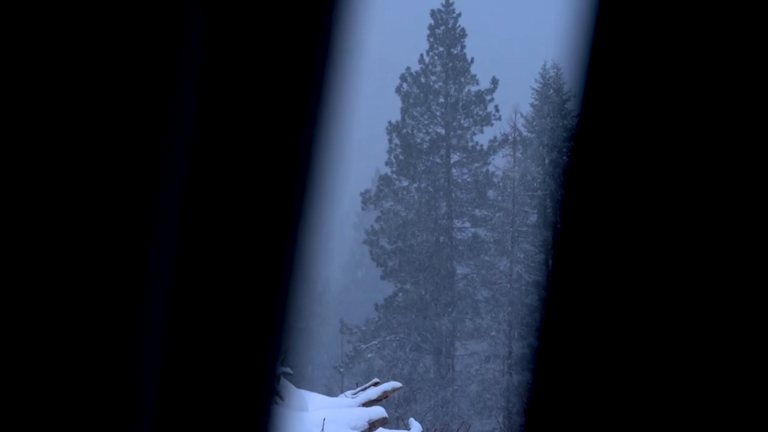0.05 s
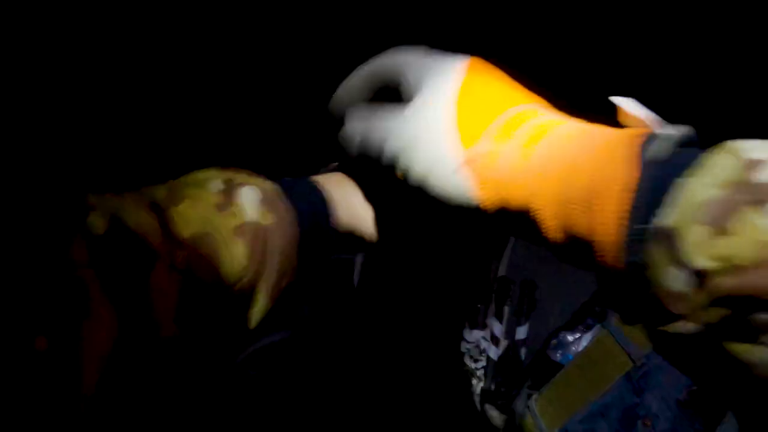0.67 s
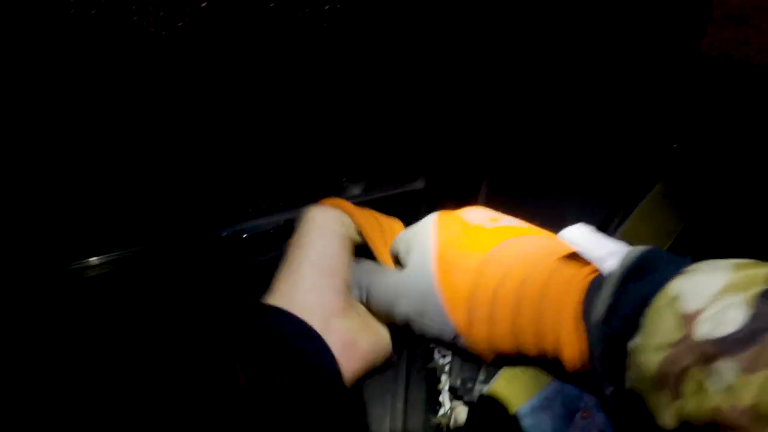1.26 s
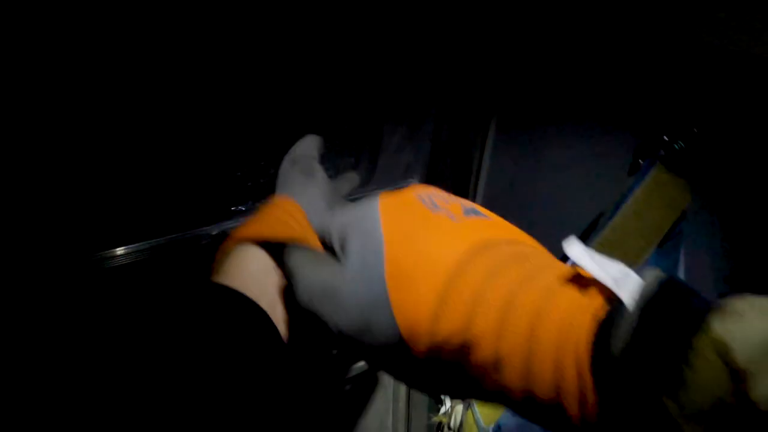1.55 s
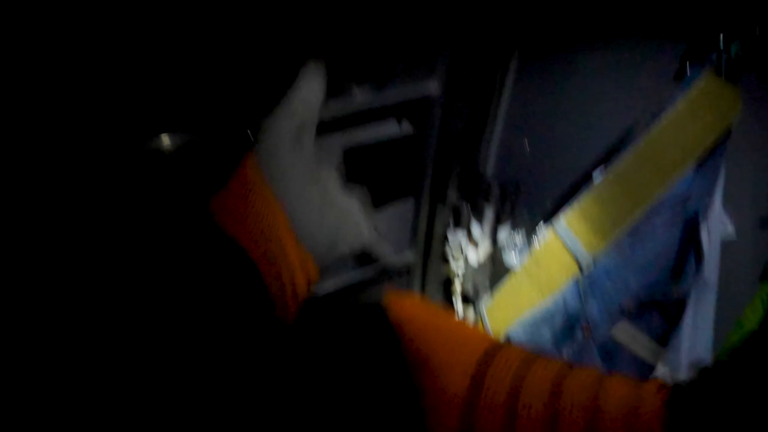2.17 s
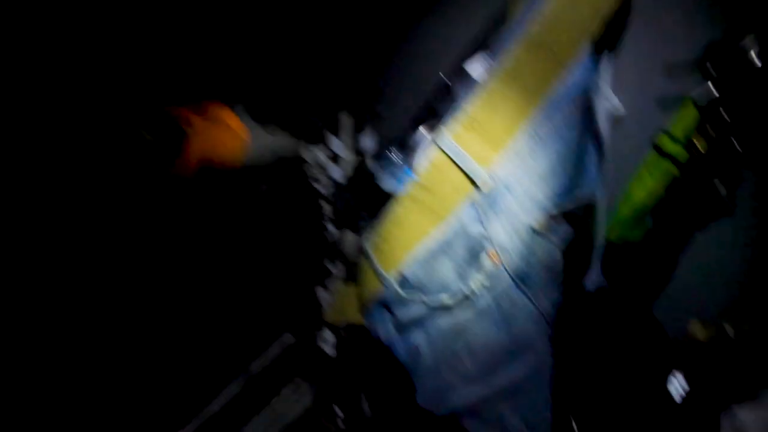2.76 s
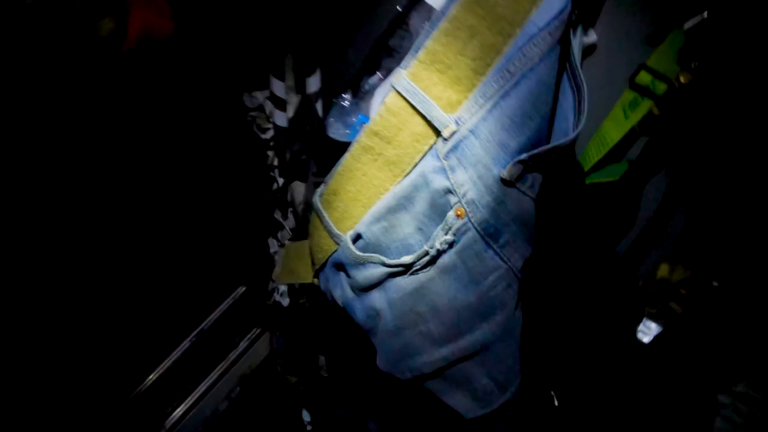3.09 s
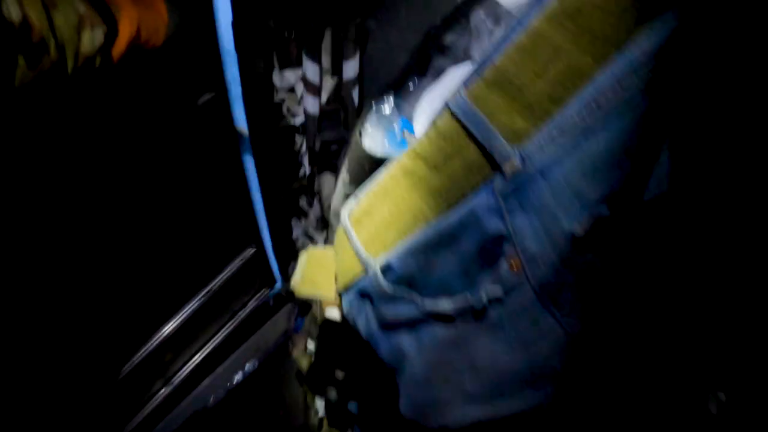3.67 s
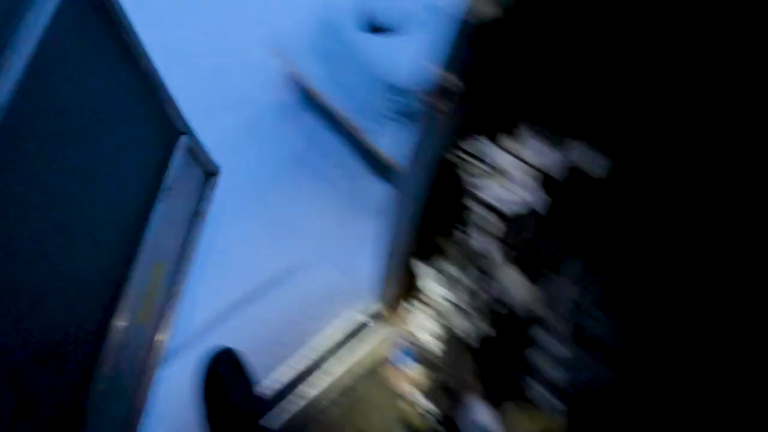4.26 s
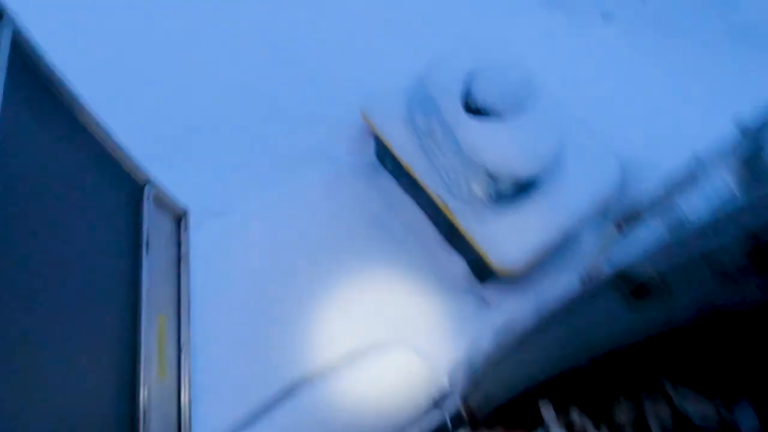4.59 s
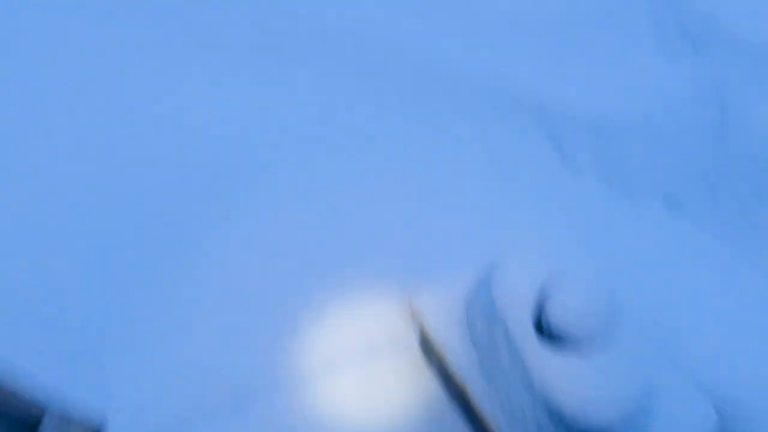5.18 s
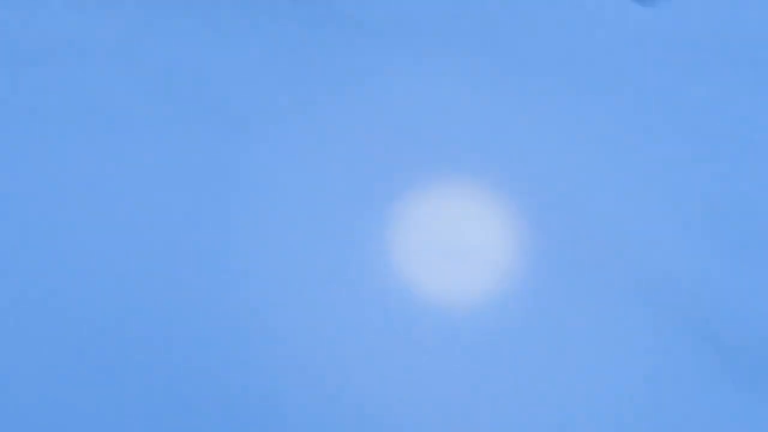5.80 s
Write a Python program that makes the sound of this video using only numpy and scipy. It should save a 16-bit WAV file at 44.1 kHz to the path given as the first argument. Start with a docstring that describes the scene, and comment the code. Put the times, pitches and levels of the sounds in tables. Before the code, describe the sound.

A moment of soft wind in trees dies away inside a vehicle cab. Someone pulls on work gloves: cloth rubs and crackles, an elastic cuff snaps on the wrist, and gear ticks and knocks. Then the door latch springs open with a loud metallic clack and a brief rattle, and a dull, wide outdoor roar rises. The body-worn microphone is close and hisses faintly.

```python
"""A vehicle's door latch springs open with a loud clack, heard close from inside the cab in snowy woods.
Before it, someone pulls on work gloves: cloth rubs and crackles, an elastic cuff snaps on the wrist,
gear ticks and knocks. After it, the door rattles free and swings open on a dull outdoor roar.
The body-worn microphone sways and hisses faintly. Everything sits in the centre but the outdoor air:
a moment of wind in the trees at the start, and the roar at the end."""
import sys
import numpy as np
from scipy import signal
from scipy.fft import rfft, irfft, next_fast_len
from scipy.io import wavfile
from scipy.ndimage import uniform_filter1d

SR = 44100
rng = np.random.default_rng(int(sys.argv[2]) if len(sys.argv) > 2 else 0)


def bounce(signal):
    """Save signal as a 16-bit WAV file at the path given by the first command-line argument."""
    frames = np.transpose(np.atleast_2d(signal))
    limited = np.clip(frames, -1, 1)
    pcm = np.round(limited * 32767).astype(np.int16)
    wavfile.write(sys.argv[1], SR, pcm)


N = 261954
TIME = np.arange(N) / SR


def door():
    """The handle takes up slack, the latch lets go and bounces, its parts rattle and the panel booms."""
    # contacts of handle and door: start_s, level_db, top_hz, boom_db
    rattles = [(3.5440, -28, 10000, -38), (3.553, -26.5, 9000, -32), (3.5604, -18, 9000, -26),
               (3.5700, -28, 3000, -24), (3.602, -20, 8000, -19), (3.6380, -23, 2800, -35),
               (3.6422, -26, 3500, -41), (3.668, -27.5, 4500, -44), (3.7012, -22.5, 9400, -35),
               (3.7187, -28, 11000, -33.5), (3.729, -23.5, 9100, -28), (3.7430, -32, 3500, -26.5),
               (3.7615, -26, 4500, -26), (3.7770, -33.5, 4000, -30)]
    # resonances of the latch: pitch_hz, width_hz, gain_db
    latch_modes = [(1215, 35, 3), (1366, 55, 6), (1590, 180, 5), (2060, 46, 1), (2385, 52, 6),
                   (2570, 85, 1), (2750, 50, 3), (2950, 99, 1), (3250, 47, -2), (3400, 55, -5.5),
                   (4000, 200, -3), (4570, 332, -3), (6220, 180, -5), (6800, 140, -4), (8250, 200, 1),
                   (9000, 536, -1.5)]
    release_s, bounce_s, latch_low_hz = 3.5795, .003, 1260
    boom = dict(low_hz=390, top_hz=760, t60_s=.1)
    blows, panel = np.zeros((2, N))
    for k in range(3):   # the release, then two bounces, each softer and duller
        blow = contact(0.78 - 8.5 * k, latch_low_hz, top_hz=10500 * .62 ** k, t60_s=.027, crack=.0805)
        add(blows, release_s + k * bounce_s, blow)
    thump = contact(level_db=-16.5, low_hz=72, top_hz=150, t60_s=.3, crack=.98)
    add(panel, release_s + bounce_s, thump + contact(level_db=-22, **boom, crack=.63))
    for start_s, level_db, top_hz, boom_db in rattles:
        add(blows, start_s, contact(level_db, latch_low_hz, top_hz, t60_s=.045, crack=.25))
        add(panel, start_s, contact(boom_db, **boom, crack=.4))
    ringing = sum(ring(blows, latch_modes))
    metal = band(from_db(-5) * blows + from_db(-4.5) * ringing, low_hz=200, top_hz=13700)
    return metal + panel + from_db(-14.5) * cab(metal + panel, top_hz=9000)


def cuff_snap(start_s=1.5403, level_db=-21.5):
    """One clean slap of elastic on skin rings briefly and wakes the cab."""
    # resonances of the cuff on the wrist: pitch_hz, width_hz, gain_db
    cuff_modes = [(244, 160, -10), (587, 175, 2.5), (755, 320, -0.5), (1120, 240, -1), (2450, 1200, -13.5),
                  (3750, 730, -10.5), (9100, 12000, -27.5)]
    impulse = np.zeros(N)
    add(impulse, start_s, np.ones(1))
    slap = sum((-1) ** k * mode for k, mode in enumerate(ring(impulse, cuff_modes)))
    slap = at_level(slap, level_db)
    return slap + from_db(-4) * cab(band(slap, 840, 12000, order=1), top_hz=6000)


def gear_ticks():
    """Small hard parts touch right beside the microphone; smaller parts sound higher."""
    # ticks of clothing and gear: start_s, level_db, low_hz
    ticks = [(0.0297, -25.5, 2600), (0.3900, -34.5, 7000), (0.459, -31, 600), (0.5538, -42, 4000),
             (0.6549, -40.5, 3000), (0.7496, -29.5, 450), (0.8420, -42.5, 7000), (1.0893, -40.5, 2500),
             (2.511, -28.5, 1500), (2.684, -35.5, 6200), (2.9312, -41.5, 600), (3.0770, -35.5, 3500),
             (3.4502, -32.5, 796), (3.4730, -38.5, 1500), (4.2654, -36.5, 4000), (4.3482, -40, 1200),
             (4.4415, -35.5, 1400), (4.5185, -34.5, 1500), (4.5463, -32.5, 1000), (4.653, -37, 600),
             (5.0050, -43.5, 4950), (5.0557, -37.5, 2500), (5.2550, -40.5, 1200)]
    out = np.zeros(N)
    for start_s, level_db, low_hz in ticks:
        top_hz = 8500 * (low_hz / 1000) ** .25
        add(out, start_s, contact(level_db, low_hz, top_hz, t60_s=.011, crack=.7, order=1))
    return out + from_db(-9.5) * cab(out, top_hz=12000)


def gear_knocks():
    """Softer, heavier contacts on hollow gear; the deeper ones stir the cab more."""
    # dull blows that excite the gear: start_s, level_db, centre_hz, t60_s
    knocks = [(0.4590, -31, 760, 0.0057), (1.2120, -42, 238, .018), (1.7230, -49, 736, 0.033),
              (1.845, -46, 150, 0.044), (2.5112, -37.5, 920, .01), (2.6110, -36.5, 500, 0.022),
              (2.615, -31.5, 1130, 0.015), (2.945, -37.5, 98, .06), (2.9891, -30, 1340, 0.039),
              (2.9940, -38, 290, 0.1), (3.2686, -40.5, 1310, 0.045), (3.2730, -40.5, 368, .07),
              (4.6667, -37.5, 1100, .009), (5.782, -32, 450, 0.028), (5.877, -45, 700, 0.054)]
    # hollow resonances of the gear: pitch_hz, width_hz, gain_db
    hollow_modes = [(267, 104, 1.5), (492, 81, 2.5), (1127, 220, 1.5), (1414, 140, 4), (1590, 75, -3.5),
                    (2335, 150, 4)]
    out, echo_send = np.zeros((2, N))
    for start_s, level_db, centre_hz, t60_s in knocks:
        blow = contact(level_db, centre_hz / 1.8, centre_hz * 1.8, t60_s, crack=.48)
        blow = band(blow, low_hz=40, top_hz=3600)   # soft surfaces take off the top
        knock = from_db(-1) * blow + sum(ring(blow, hollow_modes))
        send_db = -16 - 5 * np.log2(centre_hz / 1000)
        add(out, start_s, knock)
        add(echo_send, start_s, knock * from_db(send_db))
    return out + cab(echo_send, top_hz=4970)


def cloth_rubs():
    """Fibres catch and slip thousands of times a second under each swelling stroke."""
    # strokes of cloth and glove: middle_s, half_length_s, level_db, top_hz
    strokes = [(0.686, .023, -47, 10000), (1.117, .017, -47, 14000), (1.312, .028, -49.5, 2840),
               (1.369, .05, -58, 1400), (1.566, 0.029, -47.5, 3000), (1.801, 0.064, -50.5, 6500),
               (1.93, .11, -58.5, 15000), (2.112, 0.036, -49.5, 2600), (2.151, 0.017, -50.5, 2800),
               (2.359, 0.084, -58, 8000), (2.499, .025, -52, 2600), (2.516, 0.042, -49.5, 13000),
               (2.928, 0.045, -56.5, 1210), (2.984, .035, -52.5, 9000), (3.245, .021, -53.5, 8000),
               (3.507, .046, -58.5, 5000), (4.364, 0.024, -55, 4600), (4.583, .053, -50.5, 9000),
               (5.087, 0.028, -53, 11000), (5.293, .06, -60, 7000), (5.513, .096, -57, 9000)]
    out = np.zeros(N)
    t = TIME[:SR // 2] - 1 / 4
    for middle_s, half_length_s, level_db, top_hz in strokes:
        low_hz = min(top_hz / 2.84, 1090)
        friction = rng.standard_normal(len(t))
        slips = friction * from_db(7.2 * np.clip(rng.standard_normal(len(t)), -2, 2))
        rasp = band(band(slips, low_hz, top_hz), low_hz, top_hz)   # soft cloth gives steep edges
        rasp /= np.sqrt(np.mean(rasp ** 2) + 1e-20)
        swell = np.exp(-2 * (t / half_length_s) ** 2)
        add(out, middle_s + t[0], from_db(level_db) * swell * rasp)
    return out


def fabric_crackle():
    """Creases in stiff fabric let go at random, most of them barely above the hiss."""
    creases_per_s = with_door(shut=28, wide_open=10)
    lets_go = rng.random(N) < creases_per_s / SR
    sizes = from_db(-41 + 3.1 * np.minimum(rng.exponential(1, N), 2.5)) * rng.choice([-1, 1], N)
    clicks = band(lets_go * sizes + 1e-18, low_hz=4500, top_hz=14000)
    return clicks + from_db(-7.5) * cab(clicks, top_hz=13070)


def outdoor_air():
    """Wind in the trees drops and dies away soon after the start; later the opening door lets in a wide roar."""
    # spectrum of the wind: frequency_hz, density_db
    wind_spectrum = [(20, -6), (50, 0), (130, 2.5), (190, -1), (320, 1), (480, -3.5), (700, -9),
                     (1200, -14.5), (2000, -24.5), (4000, -30), (9000, -32), (16000, -40)]
    # spectrum of the outdoor roar: frequency_hz, density_db
    roar_spectrum = [(25, 8), (45, 3.5), (95, 0.5), (170, -5), (290, 1), (400, -0.5), (540, -3),
                     (660, -10.5), (1000, -17), (1600, -26), (3000, -33), (8000, -33), (16000, -43)]
    wind_ends_s, drop_s, drop_db, fade_db_per_s = .68, .054, 6.5, 42
    since_s = np.maximum(TIME - wind_ends_s, 0)
    wind_db = -43.5 - drop_db * np.minimum(since_s / drop_s, 1) - fade_db_per_s * since_s
    wind = from_db(wind_db) * steady_noise(wind_spectrum)
    gap = with_door(shut=0, wide_open=1)
    roar = np.sqrt(gap) * from_db(-43) * steady_noise(roar_spectrum)   # power grows with the gap
    mid, side = wind + roar
    left_right = np.array([[1], [-1]])
    return (mid + side * left_right) * from_db(-1.5 / 2 * left_right)   # leans 1.5 dB to the right


def cab_rumble():
    """The cab's low, steady rumble rises a little as the door opens."""
    # spectrum of the rumble: frequency_hz, density_db
    spectrum = [(25, -25.5), (60, 0.5), (110, 0.5), (170, 2), (260, -2.5), (380, -14.5), (540, -5.5),
                (800, -20)]
    return from_db(with_door(shut=-60, wide_open=-56.5)) * steady_noise(spectrum)[0]


def microphone_hiss():
    """A faint hiss flutters slightly and grows duller as the door opens."""
    # contour of the hiss: time_s, relative_db
    contour = [(0.0, -50), (0.58, -52.5), (0.83, -55.5), (2.89, -56.5), (3.32, -59), (3.52, -59.5),
               (3.61, -56), (3.84, -61.5), (4.71, -63), (5.94, -62.5)]
    # spectrum of the hiss: frequency_hz, density_db
    spectrum = [(300, 2.5), (1000, 0), (2000, -1.7), (3300, -2.5), (6000, -0.6), (8200, 3.5), (9300, 0),
                (10600, -8.5), (12300, 2), (13700, 2), (16000, 0.5)]
    flutter_per_s = 18
    flutter_db = 1.44 * np.interp(TIME * flutter_per_s, np.arange(1000), rng.standard_normal(1000))
    contour_db = np.interp(TIME, *np.transpose(contour))
    hiss = from_db(contour_db + 2.5 + flutter_db) * steady_noise(spectrum)[0]
    dull_share = with_door(shut=0, wide_open=.42)
    return (1 - dull_share) * hiss + dull_share * uniform_filter1d(hiss, size=3)


def microphone_sway(half_lurch_s=.35):
    """Slow pressure swings swell as each lurch of the body presses air on the microphone."""
    # lurches of the body: middle_s, level_db
    lurches = [(.82, -41.5), (2.3, -33), (3.5, -30), (4.502, -26.5), (5.75, -24.5)]
    # spectrum of the pressure swings: frequency_hz, density_db
    spectrum = [(1, -7), (4, -0.5), (8, -2.5), (12, -19.5), (22, -27), (30, -35.5), (60, -65), (200, -110)]
    swells = sum(from_db(level_db) * np.exp(-((TIME - middle_s) / half_lurch_s) ** 2)
                 for middle_s, level_db in lurches)
    return (from_db(-47) + swells) * steady_noise(spectrum)[0]


def cab(x, top_hz, t60_s=.12):
    """Close soft walls return a short, dull, dense echo."""
    t = TIME[:SR // 3]
    tail = rng.standard_normal(len(t)) * from_db(-60 * t / t60_s) * (t > .003)
    tail = signal.sosfilt(signal.butter(2, top_hz, fs=SR, output="sos"), tail / np.linalg.norm(tail))
    return signal.fftconvolve(x, tail)[:N]


def with_door(shut, wide_open):
    """A value that moves evenly from shut to wide_open as the door swings."""
    swing_starts_s, swing_s = 3.645, 1
    return shut + (wide_open - shut) * np.clip((TIME - swing_starts_s) / swing_s, 0, 1)


def contact(level_db, low_hz, top_hz, t60_s, crack, order=2):
    """Two parts meet: a sharp crack, then a dense dying chatter."""
    t = TIME[:SR // 4]
    decay = from_db(-60 * t / t60_s)
    scatter = rfft(rng.standard_normal(len(t)) * decay ** (3 / 4))
    flat = scatter / np.abs(scatter)   # a hard contact feeds all frequencies alike
    force = irfft(flat, len(t)) * decay ** .5
    force /= np.linalg.norm(force)
    force[0] = crack
    return at_level(band(force + 1e-18, low_hz, top_hz, order), level_db)


def ring(x, modes):
    """Yield the response of each mode, a two-pole resonance peaking at its gain."""
    for pitch_hz, width_hz, gain_db in modes:
        radius = np.exp(-np.pi * width_hz / SR)
        feedforward = np.array([1, 0, -1]) * (1 - radius ** 2) / 2
        feedback = [1, -2 * radius * np.cos(2 * np.pi * pitch_hz / SR), radius ** 2]
        yield from_db(gain_db) * signal.lfilter(feedforward, feedback, x + 1e-18)


def steady_noise(spectrum):
    """Coloured noise as a mid signal of rms one and an unrelated side signal."""
    # stereo width of outdoor air: frequency_hz, side_minus_mid_db
    air_width = [(20, -12), (60, -0.5), (125, -4.5), (280, -1), (500, -2), (800, -4), (1400, -12.5),
                 (3000, -7), (14000, 3)]
    size = next_fast_len(N)
    hz = np.maximum(np.fft.rfftfreq(size, 1 / SR), 1e-3)
    colour, width = [from_db(np.interp(np.log(hz), np.log(curve[:, 0]), curve[:, 1]))
                     for curve in (np.array(spectrum), np.array(air_width))]
    colour /= 1 + (hz / spectrum[-1][0] / 2) ** 4   # rolls off an octave above the last point
    white = rfft(rng.standard_normal((2, size)))
    mid_side = irfft(white * [colour, colour * width], size)[:, :N]
    return mid_side / np.std(mid_side[0])


def band(x, low_hz, top_hz, order=2):
    """A high-pass of the given order, then a second-order low-pass."""
    x = signal.sosfilt(signal.butter(order, low_hz, "high", fs=SR, output="sos"), x)
    return signal.sosfilt(signal.butter(2, top_hz, fs=SR, output="sos"), x)


def at_level(sound, level_db):
    """Scale a hit so that its energy, spread over a millisecond, has this level."""
    return from_db(level_db) * sound / np.linalg.norm(sound) * np.sqrt(SR / 1000)


def from_db(db):
    """Decibels to gain."""
    return 10 ** (np.asarray(db) / 20)


def add(out, start_s, sound):
    """Mix a sound in from start_s on."""
    at = round(start_s * SR)
    out[at:at + len(sound)] += sound[:N - at]


def scene():
    """Close sounds sit in the centre of the wide outdoor background."""
    close = gear_ticks() + gear_knocks() + cuff_snap() + door() + cloth_rubs() + fabric_crackle()
    return close + outdoor_air() + cab_rumble() + microphone_hiss() + microphone_sway()


def record(dry):
    """The recorder rounds the loudest peak and cuts the highest treble."""
    ceiling, cutoff_hz = .9, 15900
    rounded = ceiling * np.tanh(dry / ceiling)
    return signal.sosfilt(signal.ellip(10, .2, 80, cutoff_hz, fs=SR, output="sos"), rounded)


dry = scene()
out = record(dry)
bounce(out)
```